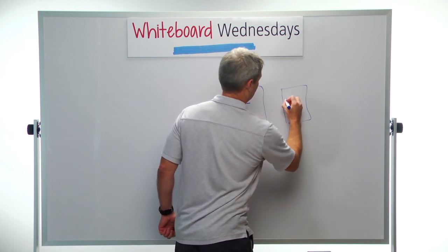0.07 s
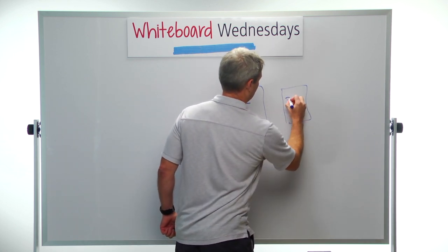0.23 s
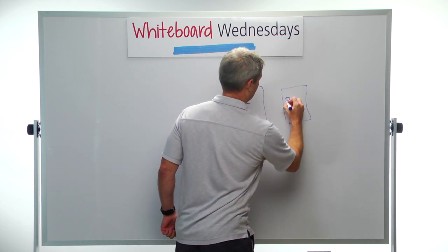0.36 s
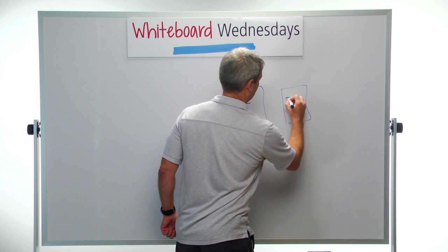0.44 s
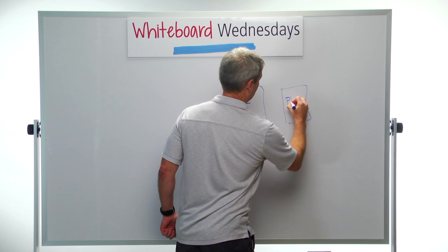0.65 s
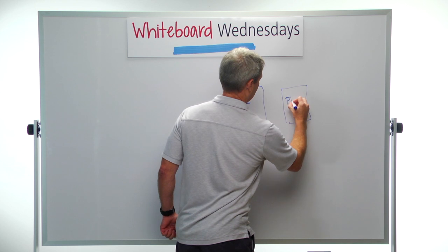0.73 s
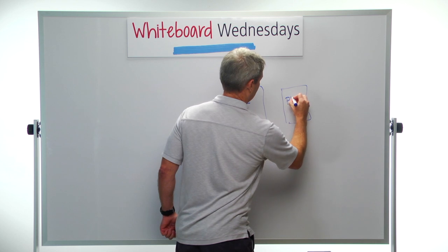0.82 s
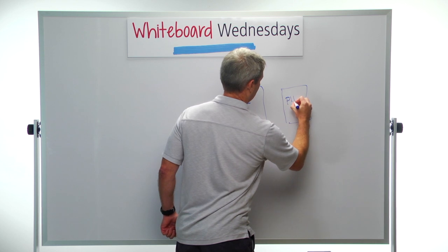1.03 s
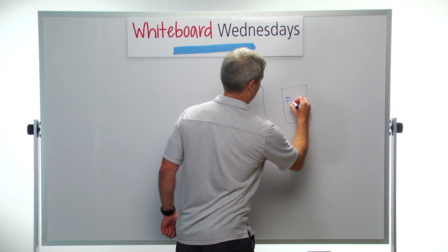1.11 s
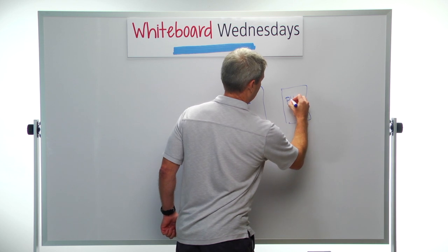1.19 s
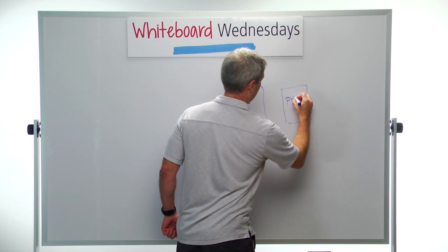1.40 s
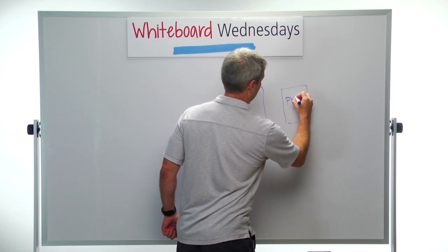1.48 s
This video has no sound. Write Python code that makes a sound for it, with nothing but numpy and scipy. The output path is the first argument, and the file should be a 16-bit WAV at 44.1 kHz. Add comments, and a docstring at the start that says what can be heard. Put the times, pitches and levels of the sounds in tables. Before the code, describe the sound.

Dry-erase marker tapping and rubbing in brief scratchy strokes on a hollow-sounding whiteboard, faint ventilation beneath

```python
"""A felt marker writes on a large free-standing whiteboard in a quiet studio.
Each landing of the tip is a half-sine push that rings the panel's modes; the thud comes back from its edges
and the walls, then dies as a dull tail. A tick rings the tip and barrel.
Each stroke is friction noise hissing through the ringing marker barrel, with a high whistle and panel rumble.
Ventilation rumble and microphone hiss lie beneath. One microphone, panned left."""
import sys
import numpy as np
from scipy import signal
from scipy.fft import rfft, irfft
from scipy.io import wavfile

SR = 44100
rng = np.random.default_rng(int(sys.argv[2]) if len(sys.argv) > 2 else 0)


def log_audio(samples):
    """Write samples as a 16-bit WAV file to the path given in sys.argv[1]."""
    # one column per channel
    frames = np.atleast_2d(samples).T
    # limit to full scale, then quantise
    limited = np.clip(frames, -1, 1)
    pcm = np.round(limited * 32767).astype(np.int16)
    wavfile.write(sys.argv[1], SR, pcm)


def gain_from_db(level_db):
    """Convert decibel levels to linear amplitude factors (20 dB per decade)."""
    decades = np.asarray(level_db, float) / 20
    return 10 ** decades


N = 68355

# Colour of the panel's diffuse sound, in the tail of a thud and in the rumble under a stroke.
# Each row: frequency in Hz, relative density in dB per Hz.
PANEL_COLOUR = [(53, -68), (90, -3.5), (248, 8.5), (325, -6), (401, 8.5), (690, -6.5), (749, -6), (1260, 4),
                (1500, 0), (1950, -63), (3300, -120)]


def rms_one(x):
    """Scale to rms 1."""
    return x / np.sqrt(np.mean(x ** 2) + 1e-20)


def coloured(spectrum):
    """Noise of rms 1 whose density in dB runs straight over log frequency between the given points."""
    hz = np.maximum(np.arange(N // 2 + 1) * SR / N, 1)
    point_hz, point_db = np.transpose(spectrum)
    gain = gain_from_db(np.interp(np.log(hz), np.log(point_hz), point_db))
    return rms_one(irfft(rfft(rng.standard_normal(N)) * gain, N))


def band(x, low_hz, high_hz):
    """Band-pass."""
    return signal.sosfilt(signal.butter(2, [low_hz, high_hz], "band", fs=SR, output="sos"), x)


def low_pass(x, hz):
    """Second-order low-pass."""
    return signal.sosfilt(signal.butter(2, hz, fs=SR, output="sos"), x)


def high_pass(x, hz, order=2):
    """High-pass, second-order unless told otherwise."""
    return signal.sosfilt(signal.butter(order, hz, "high", fs=SR, output="sos"), x)


def resonance(x, hz, width_hz):
    """Two-pole resonance, gain about 1 at its peak."""
    r = np.exp(-np.pi * width_hz / SR)
    feedback = [1, -2 * r * np.cos(2 * np.pi * hz / SR), r * r]
    return signal.lfilter([(1 - r * r) / 2, 0, (r * r - 1) / 2], feedback, x)


def modes(rows, delay=0):
    """Half a second of decaying sines, rung after a delay; the later the return, the duller its tilt."""
    dulling_per_s, pivot_hz = 10, 300
    hz, share, t60 = np.transpose(rows)
    since = np.maximum(np.arange(SR // 2) / SR - delay, 0)[:, None]
    ringing = gain_from_db(-60 * since / t60) * np.sin(2 * np.pi * hz * since)
    return ringing @ (share * (hz / pivot_hz) ** (-dulling_per_s * delay))


def panel_response():
    """Panel modes rung once, their returns from edges and walls, and a diffuse tail whose treble dies first."""
    # Modes of the panel. Each row: frequency in Hz, signed share, 60 dB decay in s.
    panel_modes = [(136, 0.194, 0.074), (179, 0.233, 0.15), (220, -0.148, 0.2), (266, -1.0, 0.107),
                   (328, -0.287, 0.074), (362, -0.367, 0.2), (431, -0.1, 0.2), (522, 0.36, 0.2),
                   (567, 0.746, 0.033), (666, -0.037, 0.2), (770, -0.073, 0.2), (995, -0.103, 0.032),
                   (1139, -0.031, 0.2)]
    # The whole panel rocks on its stand. Each row: frequency in Hz, signed share, 60 dB decay in s.
    stand_modes = [(110, 0.2, 0.032)]
    # Returns of the thud from edges and walls. Each row: delay in s, signed gain before dulling.
    returns = [(0.0069, 0.46), (0.0127, 0.27), (0.0164, 0.42), (0.0287, -0.18), (0.0333, -0.16),
               (0.0378, -0.38), (0.0408, -0.14), (0.0436, -0.23), (0.0495, 0.09), (0.0542, 0.19),
               (0.0591, 0.25), (0.0728, -0.1), (0.0867, -0.04), (0.0918, -0.06), (0.1099, -0.07)]
    tail_db, rise_s, t60_s, treble_t60_s, treble_hz = -12, 0.083, 0.49, 0.19, 520
    t = np.arange(SR // 2) / SR
    direct = modes(panel_modes) + modes(stand_modes)
    returned = sum(gain * modes(panel_modes, delay) for delay, gain in returns)
    noise = coloured(PANEL_COLOUR)[:len(t)]
    low = low_pass(noise, treble_hz)
    tail = low * gain_from_db(-60 * t / t60_s) + (noise - low) * gain_from_db(-60 * t / treble_t60_s)
    build_up = 1 - np.exp(-(t / rise_s) ** 3)
    return direct + returned + gain_from_db(tail_db) * build_up * tail


def landings():
    """A half-sine push of the contact's length drives the panel; a small tick rings the tip."""
    # The tip lands; the first time falls before the start, so only its ringing is heard.
    # Each row: middle of the push in s, strength in dB, contact time in s, tick in dB,
    # upper modes in dB relative to the strength.
    touches = [(-.11, -32.5, 0.0023, -80, 0.1), (0.2102, -31, 0.0001, -54.5, -3),
               (0.6366, -35.5, 0.00062, -65, 4), (0.9758, -30.5, 0.0015, -55.5, -15),
               (1.2818, -38, 0.0035, -62, -17)]
    # Upper panel modes, whose strength depends on the spot.
    # Each row: frequency in Hz, signed share, 60 dB decay in s.
    upper_modes = [(693, -0.15, 0.068), (739, -0.17, 0.11), (813, -0.11, 0.03)]
    # Modes of tip and barrel. Each row: frequency in Hz, level in dB, 60 dB decay in s.
    tip_modes = [(1026, 0, 0.028), (1213, 1.2, 0.018), (1510, -10, 0.0084), (2770, -9.5, 0.017),
                 (3700, -6.5, 0.017)]
    lead_s, upper_lag_s, tick_lag_s, low_cut_hz = 0.2, 0.0043, 0.00048, 85
    lead = int(lead_s * SR)  # room ahead of the start for the first landing
    t = np.arange(-lead, N) / SR
    push, upper, tick = np.zeros(N + lead), np.zeros(N + lead), np.zeros(N + lead)
    for s, db, contact_s, tick_db, upper_db in touches:
        shape = np.cos(np.pi * np.clip((t - s) / contact_s, -.5, .5))
        shape = shape / shape.sum()  # the strength sets the impulse, whatever the contact time
        push += gain_from_db(db) * shape
        upper += gain_from_db(db + upper_db) * np.roll(shape, int(upper_lag_s * SR))
        tick[int((s + tick_lag_s) * SR) + lead] = gain_from_db(tick_db)
    tip_response = modes([(hz, gain_from_db(db), t60) for hz, db, t60 in tip_modes])
    parts = (push, panel_response()), (upper, modes(upper_modes)), (tick, tip_response)
    thud = sum(signal.fftconvolve(drive, response)[:N + lead] for drive, response in parts)
    return high_pass(thud, low_cut_hz)[lead:]


def friction():
    """Felt rubbing on the board: coloured noise whose level flickers."""
    # Colour of the rubbing. Each row: frequency in Hz, relative density in dB per Hz.
    felt_colour = [(410, -16), (700, 3), (873, -13), (1210, -7.5), (1710, -2.5), (2770, 2), (3110, -2.5),
                   (3400, -1.5), (5790, -2.5), (15500, -19)]
    flicker_db = 0.5  # rms
    flicker = gain_from_db(flicker_db * rms_one(band(rng.standard_normal(N), 8.4, 100.0)))
    return coloured(felt_colour) * flicker


def through_barrel(rub):
    """The rubbing heard directly and through the barrel's resonances, each wavering in level by itself."""
    # Barrel resonances. Each row: frequency in Hz, width in Hz (at least 55 is used), relative gain in dB.
    barrel_modes = [(2736, 22, -18.5), (3332, 8, 1.5), (3452, 20, 0.5), (3660, 120, -9), (3870, 9.7, -1),
                    (4205, 83, -4), (4420, 43, 0), (4750, 25, -2.5), (5220, 39, -7), (6780, 46, -6.5),
                    (8700, 48, -8)]
    barrel_db, waver_db = 9, 3.0  # gain common to all resonances; rms of the wavering
    ringing = np.zeros(N)
    for hz, width_hz, db in barrel_modes:
        waver = gain_from_db(waver_db * rms_one(band(rng.standard_normal(N), 1.35, 18.5)))
        ringing += waver * gain_from_db(db) * resonance(rub, hz, max(width_hz, 55))
    hiss = rub + gain_from_db(barrel_db) * ringing
    return hiss / np.std(band(hiss, 2000, 7000))


def strokes():
    """Friction hiss, a high whistle and panel rumble follow the marker's strokes in level and tone."""
    # Course of the rubbing, joined by straight lines in dB. Each row: time in s, stroke level in dB,
    # whistle in dB before its trim, gain of the low part of the hiss in dB, gain of its high part in dB.
    course = [(0.0, -64.5, 4, 4, -5), (0.056, -78.5, -6, 1, 1), (0.202, -103, -7, -3, -5),
              (0.214, -67.5, -17, 8, -5), (0.232, -66.5, -26, 11, -1.5), (0.288, -76.5, -3, 6, 4),
              (0.384, -68, -17, -26, -4), (0.478, -80, -21, -3, 5), (0.656, -96, -9, -3, -3),
              (0.676, -71.5, -7, -1, 3), (0.764, -67, -16, -16, 1.5), (0.832, -81.5, -6, 0, 0),
              (0.954, -91, -6, 4, 0), (0.966, -102, -2, -3, 4), (0.98, -72, -4, -3, -5),
              (0.988, -80, -11, -3, 1), (1.01, -77, -14, 14, 1), (1.048, -69.5, 3, -33, 4.5),
              (1.126, -67, 9, -25, 4), (1.182, -80, -6, -3, 4), (1.272, -90.5, -2, 6, 4),
              (1.298, -67, -18, 7.5, 1.5), (1.338, -77, -15, 9.5, 5.5), (1.38, -71.5, -8, 5, -6),
              (1.454, -82, -4, 9, 6), (1.55, -90, -8, -3, -6)]
    low_part_hz, high_part_hz = 2430, 5670
    whistle_hz, whistle_width_hz, whistle_trim_db = 11810, 790, -15
    rumble_db = -1  # relative to the stroke level
    s, *columns = np.transpose(course)
    t = np.arange(N) / SR
    level_db, whistle_db, low_db, high_db = [np.interp(t, s, column) for column in columns]
    hiss = through_barrel(friction())
    low_part = low_pass(hiss, low_part_hz)
    high_part = high_pass(hiss, high_part_hz)
    hiss = hiss + (gain_from_db(low_db) - 1) * low_part + (gain_from_db(high_db) - 1) * high_part
    whistle = rms_one(resonance(rng.standard_normal(N), whistle_hz, whistle_width_hz))
    whistle = whistle * gain_from_db(whistle_db + whistle_trim_db)
    rumble = gain_from_db(rumble_db) * coloured(PANEL_COLOUR)
    return gain_from_db(level_db) * (hiss + whistle + rumble)


def room_tone():
    """Steady ventilation rumble and microphone hiss, as one coloured noise."""
    # Colour of room and microphone. Each row: frequency in Hz, relative density in dB per Hz.
    air_colour = [(12, -81), (20, -18.5), (36, -6), (65, -17.5), (101, -6.5), (275, 1), (385, -4.5),
                  (455, -10), (840, -16.5), (1240, -23), (1510, -21.5), (3480, -24.5), (4120, -26),
                  (10300, -25), (15700, -25.5)]
    return gain_from_db(-66) * coloured(air_colour)


def scene():
    """All sources at the one microphone, panned left by level alone."""
    pan_db = 4.5  # left over right
    mono = landings() + strokes() + room_tone()
    pan = gain_from_db(np.array([[.5], [-.5]]) * pan_db)
    return mono * pan / pan.mean()


def top_cut(x):
    """Nothing passes above the cut-off."""
    return signal.sosfilt(signal.butter(12, 16520, fs=SR, output="sos"), x)


def record(dry):
    """Each channel adds a little hiss of its own, the left a deep drift; the top is cut."""
    hiss_db = np.array([[-95.5], [-83.5]])  # left, right: white noise before its high-pass
    hiss_low_hz, drift_db, top_cut_hz = 9100, -90, 15730
    hiss = gain_from_db(hiss_db) * high_pass(rng.standard_normal(dry.shape), hiss_low_hz, order=3)
    drift = gain_from_db(drift_db) * rms_one(band(rng.standard_normal(N), 5.2, 44.0)) * [[1], [0]]
    mix = dry + hiss + drift
    below_cut = np.arange(N // 2 + 1) * SR / N < top_cut_hz
    mix = irfft(rfft(mix) * below_cut, N)
    return top_cut(mix)


dry = scene()
out = record(dry)
log_audio(out)
```